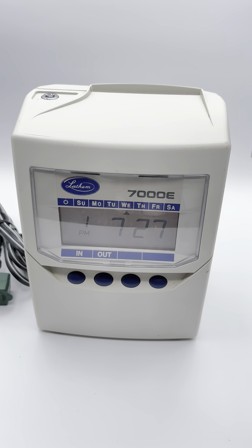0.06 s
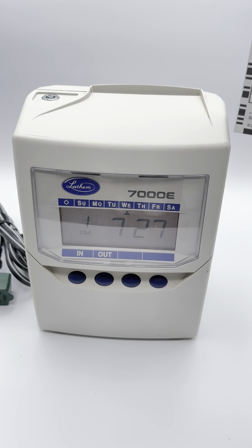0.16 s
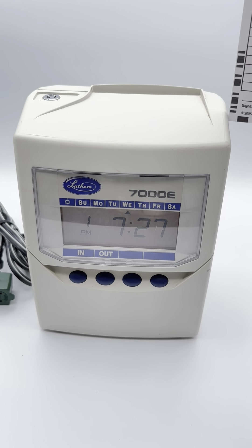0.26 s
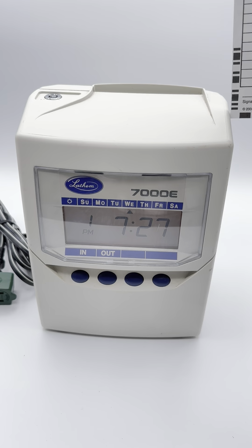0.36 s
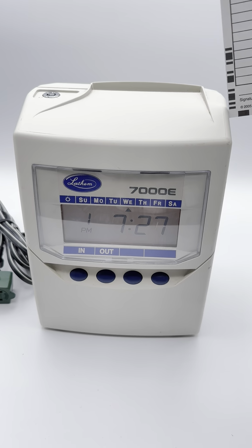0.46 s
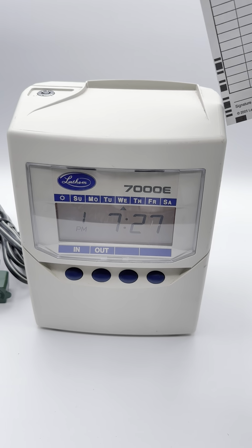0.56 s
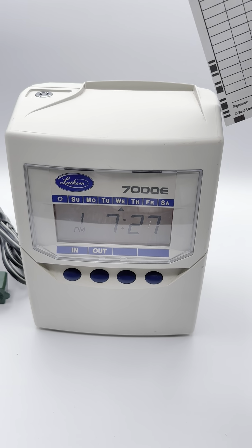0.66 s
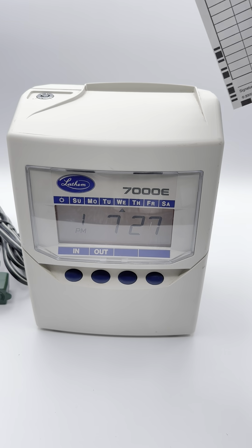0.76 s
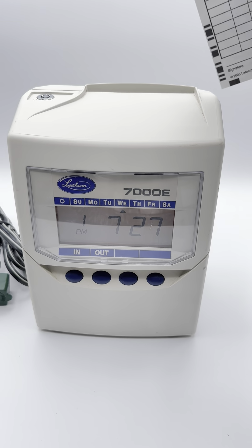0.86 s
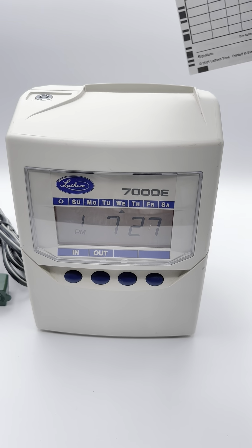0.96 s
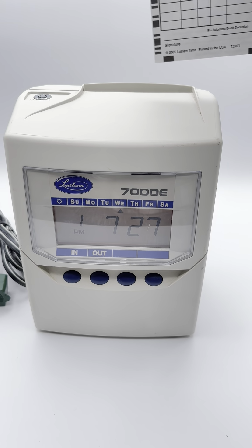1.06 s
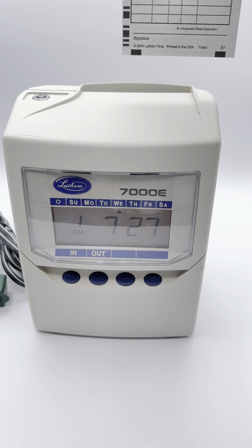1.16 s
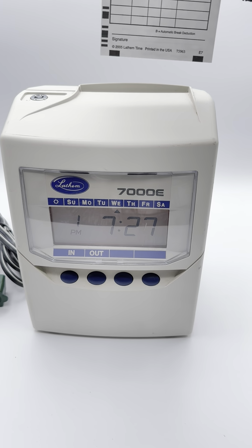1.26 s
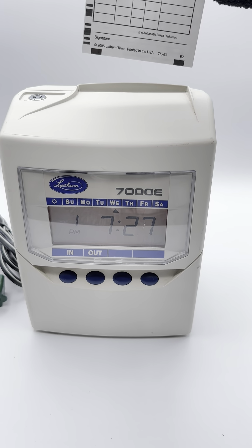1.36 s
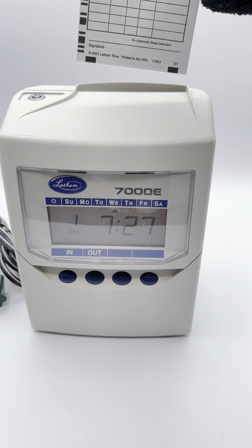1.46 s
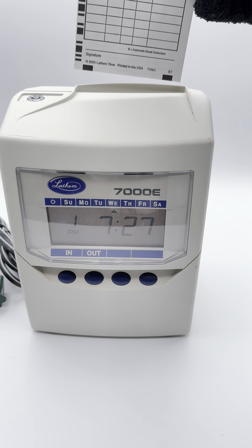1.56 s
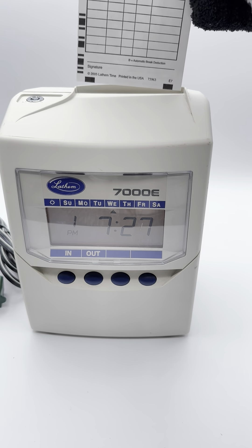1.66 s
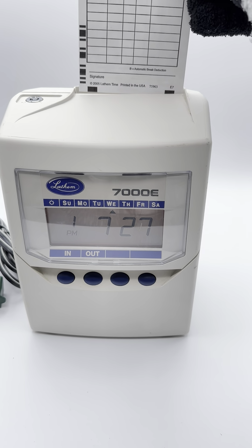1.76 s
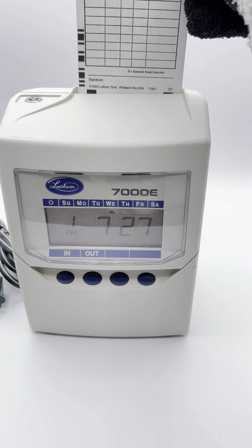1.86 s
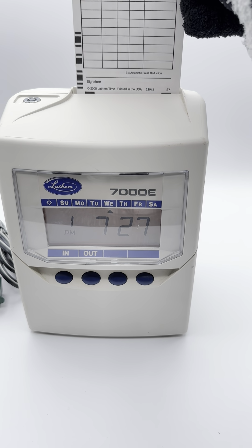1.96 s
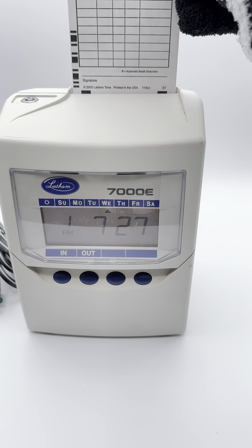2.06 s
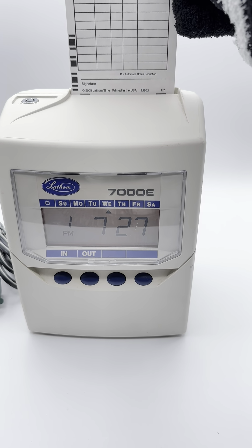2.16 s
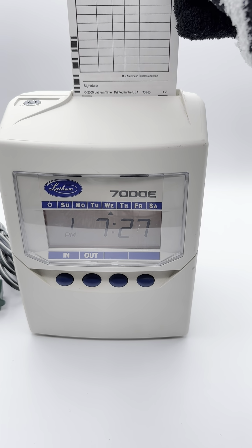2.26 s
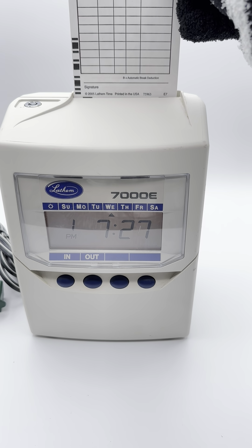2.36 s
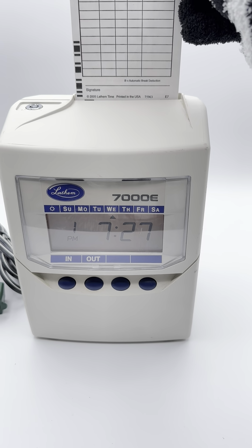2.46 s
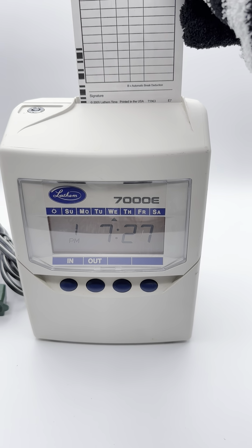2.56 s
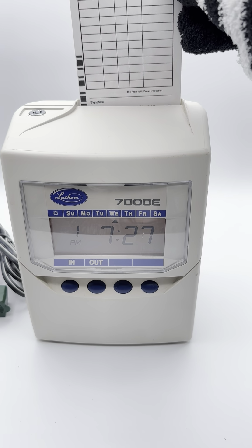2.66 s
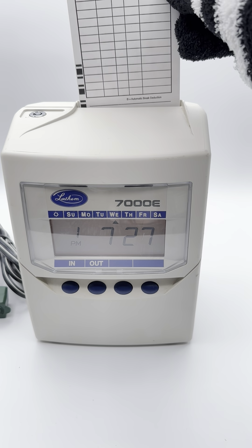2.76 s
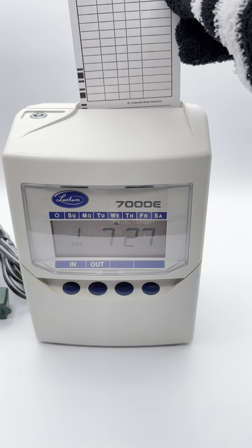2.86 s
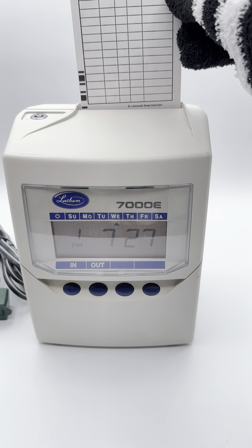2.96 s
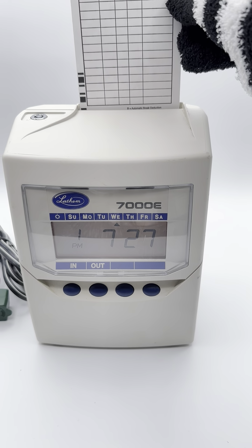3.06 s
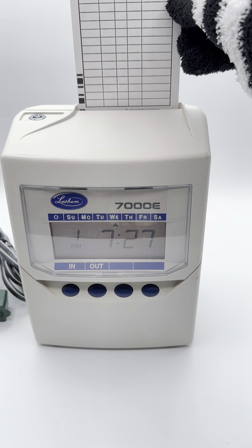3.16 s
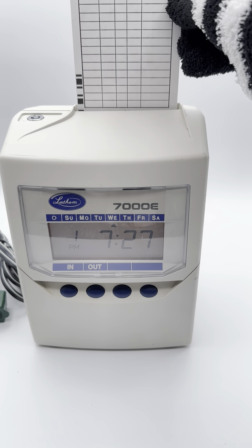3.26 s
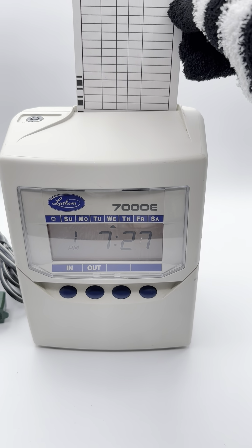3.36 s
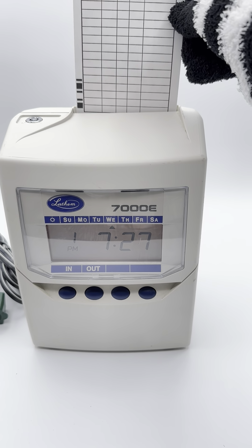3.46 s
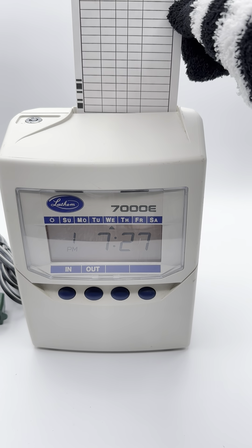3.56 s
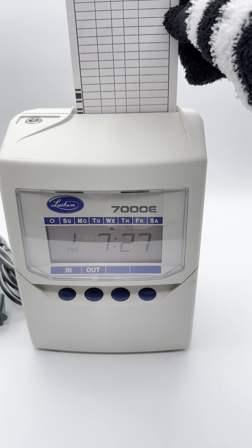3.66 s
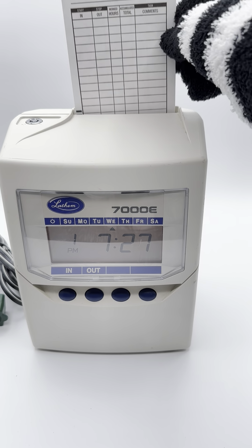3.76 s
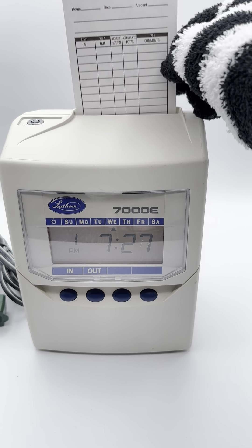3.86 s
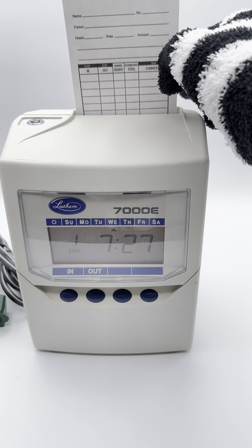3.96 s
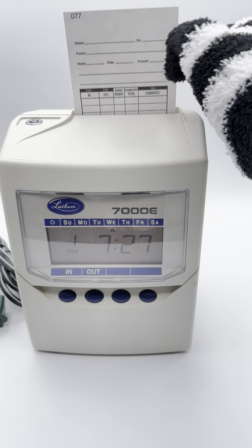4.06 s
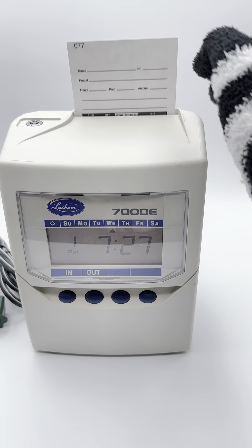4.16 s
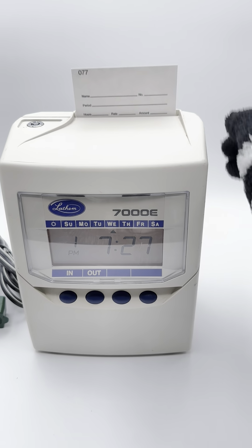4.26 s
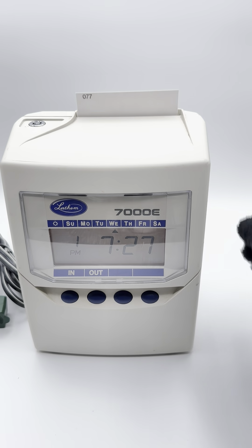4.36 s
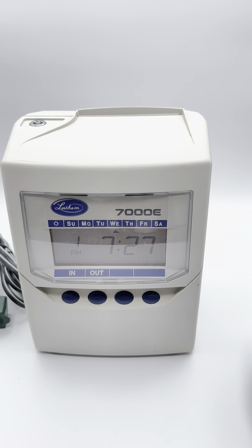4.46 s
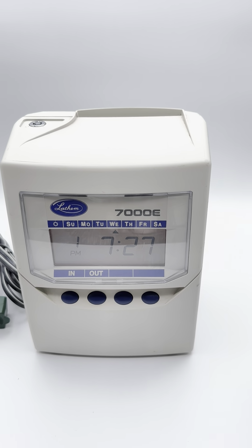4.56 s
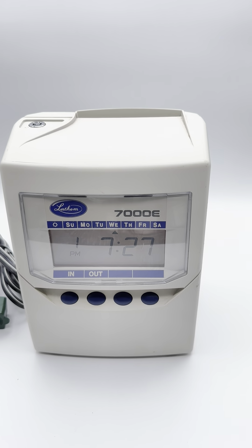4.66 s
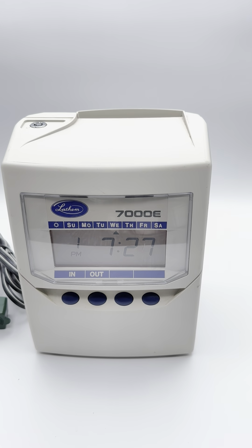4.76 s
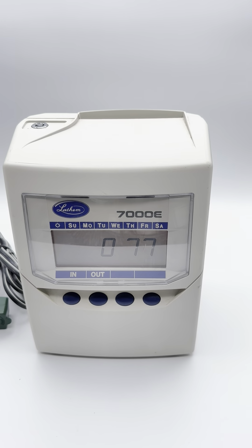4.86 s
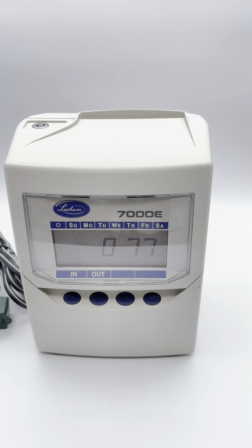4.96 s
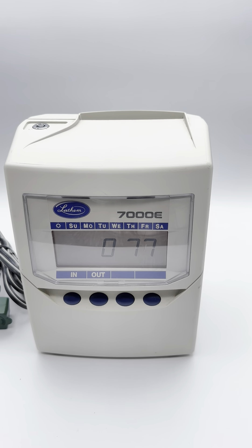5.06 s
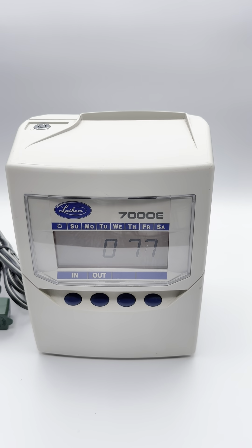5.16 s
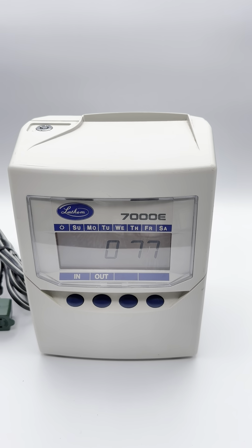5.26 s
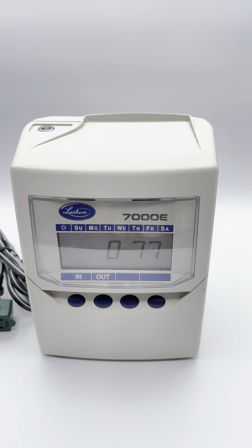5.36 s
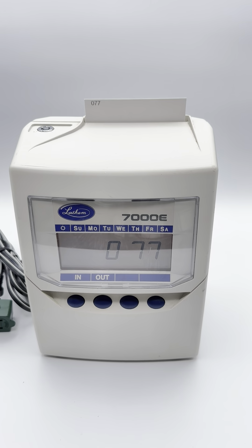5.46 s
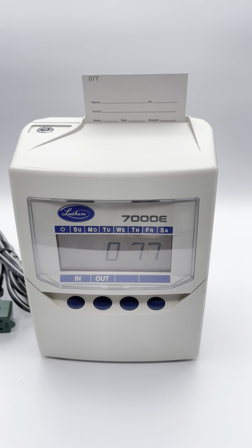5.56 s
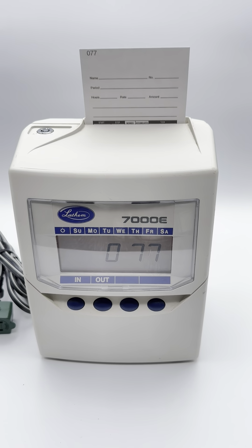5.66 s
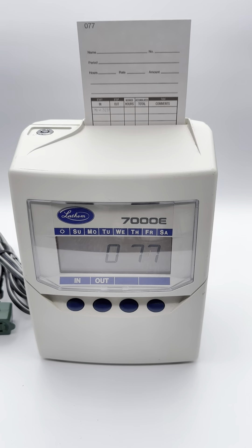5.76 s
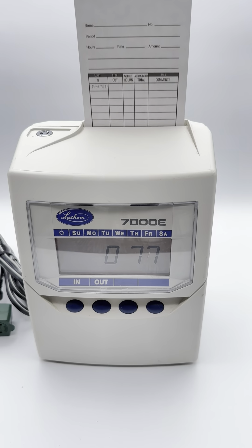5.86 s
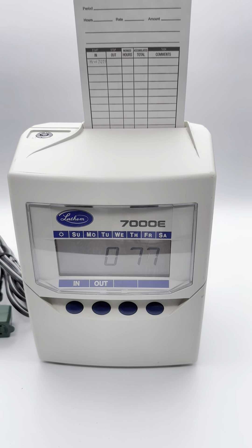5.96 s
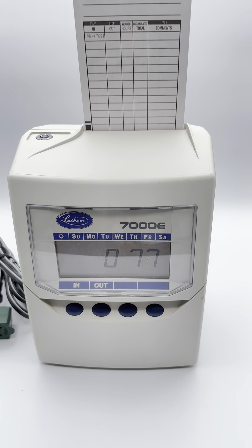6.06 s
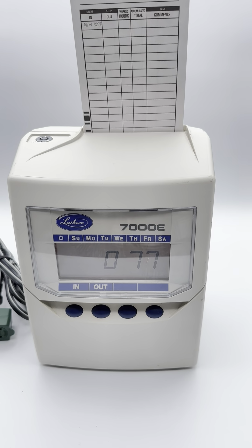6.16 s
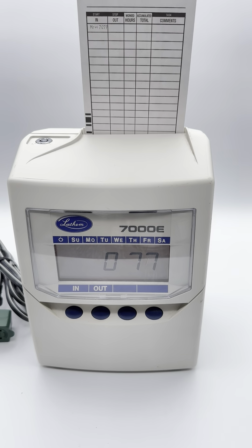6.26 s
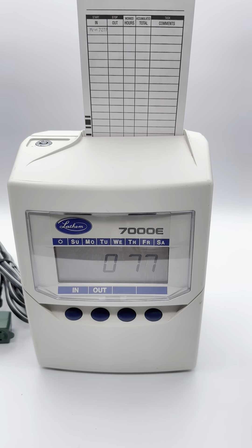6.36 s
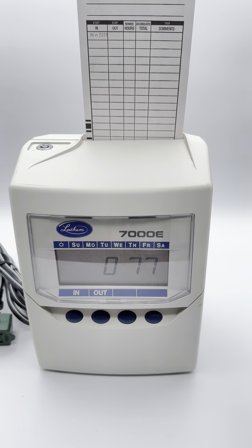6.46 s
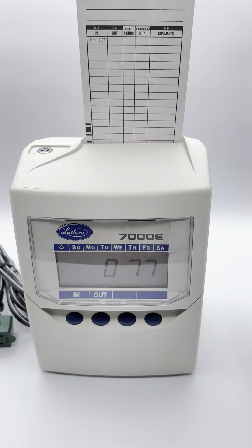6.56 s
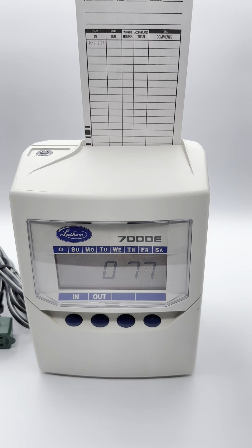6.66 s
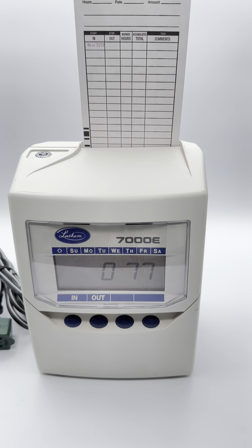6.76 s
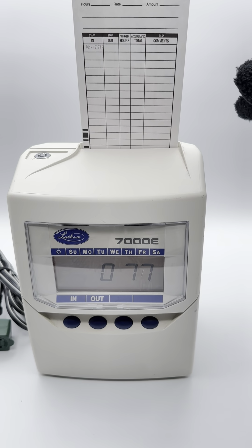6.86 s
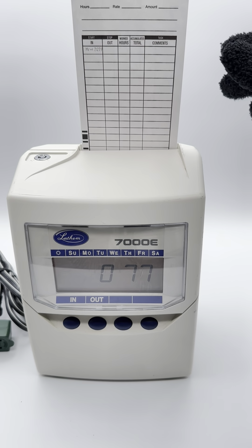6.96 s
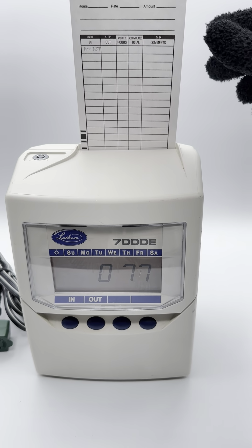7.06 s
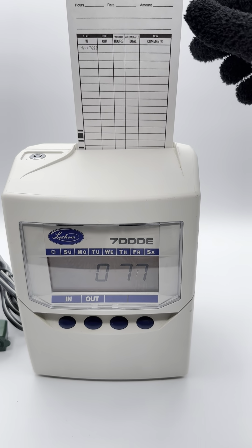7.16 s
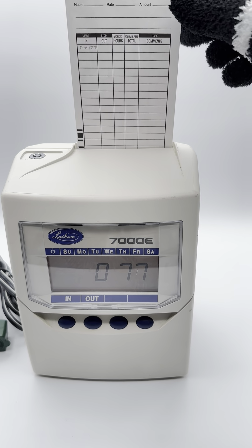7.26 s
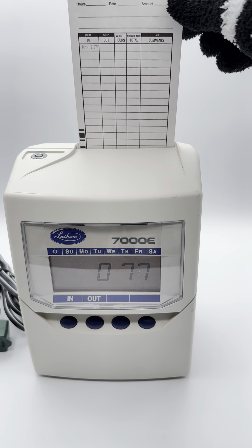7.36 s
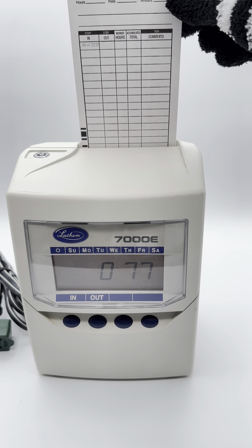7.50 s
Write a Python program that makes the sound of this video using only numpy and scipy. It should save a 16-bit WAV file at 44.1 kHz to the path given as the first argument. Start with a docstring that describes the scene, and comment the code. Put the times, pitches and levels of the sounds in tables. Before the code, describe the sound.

A close stereo microphone in a small, quiet room with faint mains hum, dull room tone and soft hiss. From 0.2 to 0.7 seconds a stiff card taps plastic a few times, with short papery rubs; more light taps come around 1.8, 2.0 and a clearer one at 2.5. A faint low drone rises slowly underneath from 1.5 to 5.3. At 3.2 a sharp click starts a small geared motor, whirring and rattling; at 3.7 it grips the card with dull knocks and a strained tone, coasting down after 4.5. Small clicks fall between 4.8 and 5.0. At 5.05 a carriage whines and rattles, with a tiny, bright needle buzz at 5.15, then knocks and squeaks until 5.5. From 5.33 the motor whirs again, slightly higher, pushing the card out; a loud clack rings at 6.14, then it runs freely and stops abruptly at 7.4, leaving quiet hum.

```python
"""A small quiet room, a stereo microphone close to an electric time clock: a paper card taps and rubs first.
A geared motor then starts and draws the card in, as summed gear tones over the rattle of random tooth impacts.
After it stops, a carriage whines and rattles, and needles strike one short burst of print on a rapid beat.
The motor pushes the card back out, with a loud clack of filtered noise and ringing case modes on the way.
Mains hum and dull room tone lie underneath; a faint rising drone joins them for part of the time."""
import sys
import numpy as np
from scipy import signal
from scipy.fft import rfft, irfft, next_fast_len
from scipy.io import wavfile

SR = 44100
rng = np.random.default_rng(int(sys.argv[2]) if len(sys.argv) > 2 else 0)


def materialize(psi):
    """Save the field psi as 16-bit PCM at rate SR to the path in sys.argv[1].

    A 1-D psi becomes a single channel; in a 2-D psi each row is a channel.
    """
    bounded = np.clip(np.atleast_2d(psi).T, -1, 1)
    quanta = np.round(bounded * 32767).astype(np.int16)
    wavfile.write(sys.argv[1], SR, quanta)


N = 332073
TIME = np.arange(N) / SR

# gear tones, card going in and coming out, before the overall tone level: (multiple of shaft speed [ratio],
# level running free [dB], level with card gripped [dB], swell per unit of roller tightness [dB])
GEAR_TONES_IN = [(3.02, -15, -11, 0), (5, -14, -4, 0), (8.33, -15, -21, 0), (10, -.5, -2, 3.5),
                 (13.16, -9, -22, 0), (14.15, -6, 0, 0), (15, -6, -20, 0), (17.9, -16, -24, 0),
                 (20.05, -17, -19, 0), (22.65, -26, -13, 2), (28.36, -10, -16, 0), (41.1, -17, -16, 0),
                 (42.52, -8, -4.5, 0)]
GEAR_TONES_OUT = [(3.03, -9, -12, 0), (3.98, -12, -20, 0), (4.98, -8, -4.5, 0), (9.12, -1, -5.5, 1),
                  (10, -3, -3.5, 2), (13.5, -12, -16, 0), (14.32, -8, -16, 0), (15.26, -19, -8.5, 0),
                  (17.67, -10, -18, 0), (20.42, -15, -15, 0), (22.35, -21, -10, 0), (28.31, -4.5, -19, 0),
                  (29.72, -13, -19, 0), (38.85, -12, -20, 0), (41.2, -19, -10, 0), (42.58, -5, -3.5, 0),
                  (49.25, -20, -18, 0), (57.67, -18, -24, 0)]
# colour of the gear rattle in each direction: (frequency [Hz], relative level [dB])
RATTLE_COLOUR_IN = [(150, -31), (580, -14), (760, -4.5), (900, 4), (1080, -11), (1300, -2), (1550, -9.5),
                    (1800, -9), (2030, -3.5), (2200, -10), (2450, -4), (2820, -10), (3750, -3),
                    (4500, -14.5), (5200, -15), (7000, -47)]
RATTLE_COLOUR_OUT = [(150, -26.5), (600, -11.5), (760, -6.5), (880, 1), (1030, -4), (1300, -2),
                     (1750, -8.5), (1950, -5.5), (2200, -10.5), (2720, -4), (2950, -8.5), (3400, -9.5),
                     (3650, -3), (4400, -17.5), (4950, -10), (5370, -13), (5700, -20.5), (6500, -16.5),
                     (12000, -63)]
# speed of the motor shaft in each direction: (time [s], turns per second [Hz])
SHAFT_SPEED_IN = [(3.18, 78), (3.26, 83), (3.32, 90.4), (3.72, 90), (3.82, 87.2), (4.3, 87.2), (4.36, 88),
                  (4.5, 87.9), (4.65, 82)]
SHAFT_SPEED_OUT = [(5.33, 82), (5.45, 88.2), (5.6, 89.5), (6, 91), (6.13, 90.9), (6.2, 91.8), (7.36, 92.3),
                   (7.45, 88)]
# colour of the sliding card, also of bright impact edges: (frequency [Hz], relative level [dB])
SLIDE_COLOUR = [(2500, -34), (4400, 4.5), (5000, 3), (6400, 2.5), (8000, 1), (10000, 4), (11500, -9.5),
                (15500, -11)]
# colour of the rumbling case, also of impact thuds: (frequency [Hz], relative level [dB])
RUMBLE_COLOUR = [(90, -31), (160, -1.5), (205, -2.5), (270, 2), (350, 2), (440, -3), (520, -6), (640, -24),
                 (1200, -46)]
# the rollers hold the card between these times; its edge starts to scrape in the guide a little sooner
GRIP_S, RELEASE_S, SCRAPE_S, GRIP_RAMP_S = 3.72, 6.13, 3.607, 0.017
SCRAPE_RAMP_S, SCRAPE_DB = 0.14, 8.5  # how fast and how much the sliding hiss grows
# the feed roller turns at this share of the shaft speed; one tight spot passes at this time
ROLLER_SHARE, ROLLER_TIGHT_S = .07, 3.98
GEAR_RISE_S, HUM_RISE_S, RUMBLE_FADE_S = 0.057, 0.18, 0.59


def feed(tones, gears, on_s, off_s, coast_s, speeds, strain_db, tones_db, rattle_db, slide_db, rumble_db,
         hum_db, hum_held_db, throb, flutter, backlash):
    """A small motor and gear train hum, mesh and rattle; the gripped card shifts the tones and strains the gears."""
    grip = ramp(GRIP_S, GRIP_RAMP_S) - ramp(RELEASE_S, GRIP_RAMP_S)
    scrape = ramp(SCRAPE_S, SCRAPE_RAMP_S) - ramp(RELEASE_S, GRIP_RAMP_S)
    speed = np.interp(TIME, *np.transpose(speeds))
    turns = np.cumsum(speed * (1 + flutter * wander(21.9))) / SR
    shaft = 2 * np.pi * turns

    # the teeth press harder once and twice a shaft turn and once a turn of the slower idler wheel
    load = 1 + throb * np.cos(shaft) + 0.047 * np.cos(2 * shaft)
    load = load + 0.12 * np.cos(shaft * .208) + 0.14 * wander(20)

    # play between the teeth jitters the wheels, which smears the high tones most
    angle = shaft + backlash * wander(80) + .006 * wander(250)
    roller = 2 * np.pi * ROLLER_SHARE * (turns - np.interp(ROLLER_TIGHT_S, TIME, turns))
    tight = np.cos(roller) + .5 * np.cos(2 * roller)
    mesh = np.zeros(N)
    for multiple, free_db, held_db, swell_db in tones:
        level = amp(free_db + grip * (held_db - free_db) + swell_db * tight)
        mesh += level * (1 + 0.36 * wander(44)) * np.sin(multiple * angle)

    running = gate(on_s, off_s, GEAR_RISE_S, coast_s)
    song = amp(tones_db) * np.sqrt(2) * mesh * running ** 3  # coasting gears rattle but hardly sing
    rattle = amp(rattle_db) * chatter(6000, 1.34, gears, apart=0.58)
    paper = amp(slide_db + SCRAPE_DB * scrape) * chatter(12000, 0.41, SLIDE_COLOUR, apart=0.039)
    gears_and_card = running * load * (song + amp(strain_db * grip) * rattle + paper)

    rumble_swell = gate(on_s, off_s, GEAR_RISE_S, RUMBLE_FADE_S)
    rumble = amp(rumble_db) * rumble_swell * colour(noise() * load, RUMBLE_COLOUR)
    hum_swell = gate(on_s, off_s, HUM_RISE_S, coast_s)
    hum = amp(hum_db + hum_held_db * grip) * hum_swell * np.sqrt(2) * np.sin(shaft)
    return gears_and_card + rumble + hum


# print carriage, out and back: (time [s], pitch of its drive [Hz], level of the whine [dB])
CARRIAGE_WHINE = [(5.05, 900, -46), (5.075, 930, -43), (5.087, 960, -37), (5.098, 1100, -47),
                  (5.112, 1190, -37), (5.128, 1290, -40), (5.143, 1225, -31), (5.16, 1192, -33),
                  (5.27, 1194, -32.5), (5.295, 1175, -37), (5.308, 1215, -43), (5.335, 1285, -39),
                  (5.356, 1195, -32), (5.372, 1130, -42), (5.39, 1200, -36), (5.408, 1235, -38),
                  (5.425, 1200, -48), (5.47, 1080, -47), (5.5, 950, -45), (5.512, 900, -31),
                  (5.53, 880, -40)]
# colour of the carriage rattle: (frequency [Hz], relative level [dB])
CARRIAGE_COLOUR = [(300, -11), (600, -6.5), (950, 3), (1250, 0.5), (1600, -9.5), (2200, -10), (3000, -21),
                   (3750, -11), (4500, -18), (6500, -21), (10000, -24.5), (11800, -43), (15500, -47)]
CARRIAGE_START_S, CARRIAGE_STOP_S, CARRIAGE_RISE_S, CARRIAGE_FALL_S = 5.04, 5.515, 0.06, 0.03
CARRIAGE_SHAKE_S, CARRIAGE_RATTLE_DB, CARRIAGE_RUMBLE_DB = 0.05, -40.3, -45


def carriage():
    """The drive whines up to speed, holds steady under the print and wavers home, shaking the carriage."""
    times, hz, db = np.transpose(CARRIAGE_WHINE)
    turns = np.cumsum(np.interp(TIME, times, hz) * (1 + 0.014 * wander(130))) / SR
    teeth = 1 + 0.25 * np.cos(2 * np.pi * turns / 8) + 0.24 * wander(160)
    whine = amp(np.interp(TIME, times, db)) * np.sqrt(2) * np.sin(2 * np.pi * turns)
    rattle = amp(CARRIAGE_RATTLE_DB) * chatter(1200, 1.3, CARRIAGE_COLOUR, apart=0.53)
    rumble = amp(CARRIAGE_RUMBLE_DB) * chatter(900, 0.82, RUMBLE_COLOUR, apart=0.045)
    shaking = np.sqrt(ramp(CARRIAGE_START_S, CARRIAGE_SHAKE_S))
    moving = gate(CARRIAGE_START_S, CARRIAGE_STOP_S, CARRIAGE_RISE_S, CARRIAGE_FALL_S)
    return moving * teeth * (whine + shaking * (rattle + rumble))


# colour of needles and platen: (frequency [Hz], relative level [dB])
HEAD_COLOUR = [(60, -48), (200, -12), (400, -7), (520, 9), (750, -10.5), (1050, 1), (2100, -1),
               (2800, -11.5), (3250, 0), (3900, -15), (5000, -1), (5700, -4.5), (6900, 2.5), (7500, -2.5),
               (9400, 4), (11500, -3.5), (15500, -7.5)]
NEEDLE_HZ = 1067
PRINT_START_S, PRINT_STOP_S, PRINT_RISE_S, PRINT_FALL_S, PRINT_DB = 5.147, 5.19, 0.006, 0.016, -22.7


def needles():
    """Needles fire on a slightly unsteady beat with varying strength, and chatter as they rebound."""
    beat = np.diff(np.floor(TIME * NEEDLE_HZ + 0.07 * wander(200)), prepend=0)
    strength = 1 + 0.58 * np.cos(2 * np.pi * TIME * NEEDLE_HZ / 3) + 0.74 * noise()
    t = np.arange(SR // 100) / SR
    housing = noise(len(t)) * amp(-60 * t / 0.016)  # each strike scatters inside the housing
    strikes = unit(signal.oaconvolve(beat * strength, housing)[:N])
    rebound = 0.93 * grains(12000, 0.63)
    burst = gate(PRINT_START_S, PRINT_STOP_S, PRINT_RISE_S, PRINT_FALL_S)
    return amp(PRINT_DB) * burst * colour(strikes + rebound, HEAD_COLOUR)


# the card tapping the case: (time [s], level [dB], thud above a -23 dB base [dB], brightness [dB],
# card ring [dB], centre of the modes it wakes [Hz])
CARD_TAPS = [(0.22, -37.5, 2.5, -3, -3, 1110), (0.47, -61, -2, -12, 4, 1150),
             (0.485, -51.5, 3, -16, 7, 1100), (0.515, -46, -2, -16, 5, 1000),
             (0.721, -49, -7, -10, 3, 1600), (0.731, -40.5, -5, -11, 1.5, 1390),
             (1.793, -53, 11, -8, 3, 900), (1.803, -50, 10, -10, -4, 450), (1.826, -46.5, 8, -13, 3.5, 830),
             (1.844, -57, 6, -7, 0, 1400), (1.954, -51, 2, 1.5, 1, 1200), (2.021, -51, 7, -11, 4.5, 1110),
             (2.423, -55.5, 7, -2, -2, 1200), (2.51, -36.5, -1, -13.5, 5, 930),
             (2.659, -59, 15.5, -7, 3, 600), (3.021, -61.5, 5, -14, 4, 980),
             (4.815, -45, -10, -16, -3, 2000)]
# light, sharp ticks of switches and pawls: (time [s], level [dB])
SWITCH_TICKS = [(3.118, -51.5), (4.925, -32), (4.988, -36.5), (5.341, -30.5)]
# heavy clacks of the mechanism: (time [s], level [dB], thud above a -23 dB base [dB], case ring [dB],
# centre of the modes it wakes [Hz])
MECHANISM_CLACKS = [(3.177, -36, -10, -3, 1300), (3.187, -28.5, -1, 0, 2450), (3.19, -41.5, -18, 14, 884),
                    (4.833, -40, 7.5, 3.5, 870), (4.843, -49, -5, 9, 1000), (4.856, -53.5, 2, 11.5, 910),
                    (4.873, -55, -9, 11, 800), (5.309, -42, 6, 17, 710), (5.353, -34.5, 3, 2, 1200),
                    (5.451, -40, 3, 7, 900), (5.506, -42.5, 7, 8.5, 900), (6.133, -33.5, -12, 5, 1200),
                    (6.1363, -18, -4, -1.5, 950), (6.1419, -30, 5, 3, 350)]
# modes of the stiff card struck on its edge: (frequency [Hz], relative level [dB], t60 [s])
CARD_EDGE_MODES = [(447, 7, 0.05), (694, 2, .06), (757, 2.5, .06), (879, -3.5, 0.071), (975, -8.5, 0.058),
                   (1206, 3.5, 0.043), (1350, -2, 0.044), (1613, 0.5, 0.055), (1930, 3.5, 0.046),
                   (3085, 2.5, .035)]
# modes of the plastic case: (frequency [Hz], relative level [dB], t60 [s])
CASE_MODES = [(191, -1, 0.14), (286.6, -0.5, 0.19), (366.6, 3, 0.11), (693, -2, 0.053), (800, -7, 0.06),
              (884, 1, 0.051), (944, -4.5, 0.058), (1182, 0, 0.032), (1332, -2.5, 0.041), (1367, -6, 0.044),
              (1556, -10, 0.03), (1835, -15, .04), (2100, -6, 0.045), (2826, 3, 0.035), (3620, 2, 0.026)]


def clicks():
    """Taps wake the modes of the card; switch ticks and mechanism clacks wake those of the case."""
    out = np.zeros(N)
    for s, db, thud_db, bright_db, ring_db, centre_hz in CARD_TAPS:
        add(out, s, blow(db, thud_db, bright_db, ring_db, centre_hz, t60=0.04, modes=CARD_EDGE_MODES))
    for s, db in SWITCH_TICKS:
        add(out, s, blow(db, thud_db=-20.0, bright_db=0.5, ring_db=-11.5, centre_hz=2200, t60=0.031,
                         modes=CASE_MODES))
    for s, db, thud_db, ring_db, centre_hz in MECHANISM_CLACKS:
        add(out, s, blow(db, thud_db, bright_db=-11.5, ring_db=ring_db, centre_hz=centre_hz, t60=0.043,
                         modes=CASE_MODES))
    return out


# colour of the clatter in each blow: (frequency [Hz], relative level [dB])
CRACK_COLOUR = [(300, -34), (700, -5), (1300, 1.5), (2700, -4), (4000, -10), (5500, -8), (11000, -56.5)]


def blow(db, thud_db, bright_db, ring_db, centre_hz, t60, modes):
    """A short clatter with a bright edge, a low thud and the ring of what was struck."""
    t = np.arange(SR // 3) / SR
    burst = amp(-60 * t / t60) * (1 - np.exp(-t / 0.001))
    edge = amp(bright_db) * colour(noise(len(t)), SLIDE_COLOUR)
    crack = burst * (colour(noise(len(t)), CRACK_COLOUR) + edge)
    thud = colour(noise(len(t)) * amp(-60 * t / 0.12), RUMBLE_COLOUR)
    ring = np.zeros(len(t))
    for hz, mode_db, decay in modes:
        # where the blow lands decides which modes ring most
        off_centre_db = 11.8 * abs(np.log2(hz / centre_hz))
        level = amp(mode_db - off_centre_db - 60 * t / decay)
        ring += level * np.sin(2 * np.pi * (hz * t + rng.random()))
    ring *= 1 - np.exp(-t / 0.0017)
    return amp(db) * (0.84 * crack + amp(thud_db - 23) * thud + amp(ring_db) * ring)


# dull knocks of the case: (time [s], level [dB], pitch [Hz])
CASE_KNOCKS = [(.588, -43, 225), (2.024, -41, 190), (3.738, -22, 345), (3.755, -25, 268), (3.79, -29, 235),
               (3.823, -29, 270), (4.057, -35, 272), (4.102, -30, 258), (5.122, -20.5, 272),
               (5.296, -22.5, 205), (5.316, -24, 275), (5.351, -23.5, 330), (5.369, -19.5, 268),
               (5.392, -25, 300), (5.415, -21, 210), (5.45, -26, 230), (5.487, -22.5, 285),
               (5.522, -21.5, 232), (6.139, -26, 185), (6.141, -17.5, 405)]
KNOCK_RISE_S, KNOCK_DECAY_S, KNOCK_UPPER_RATIO, KNOCK_UPPER_DB = 0.0043, 0.063, 1.42, -10.5


def knocks():
    """Dull knocks: a panel of the case swings a few times in two modes and stops."""
    out, t = np.zeros(N), np.arange(SR // 5) / SR
    for s, db, hz in CASE_KNOCKS:
        upper = amp(KNOCK_UPPER_DB) * np.sin(2 * np.pi * KNOCK_UPPER_RATIO * hz * t)
        swing = np.sin(2 * np.pi * hz * t) + upper
        add(out, s, amp(db - 60 * t / KNOCK_DECAY_S) * (1 - np.exp(-t / KNOCK_RISE_S)) * swing)
    return out


# sudden loads that set the case rumbling: (time [s], level [dB])
LOAD_JOLTS = [(3.736, -40), (4.05, -49), (4.11, -53), (5.115, -32.5), (5.364, -33.5), (5.495, -39.5),
              (6.145, -42)]
JOLT_RISE_S, JOLT_DECAY_S = 0.023, 0.42  # the decay is a t60


def jolts():
    """Each sudden load shakes the case, which rumbles and settles."""
    shake = np.zeros(N)
    for s, db in LOAD_JOLTS:
        shake += ramp(s, JOLT_RISE_S) * amp(db - 60 * np.maximum(TIME - s, 0) / JOLT_DECAY_S)
    return shake * chatter(2500, 0.38, RUMBLE_COLOUR, apart=0.081)


# raspy squeaks of the carriage and the outgoing card: (start [s], length [s], from [Hz], to [Hz],
# level before a 3 dB cut [dB])
SLIP_SQUEAKS = [(5.068, .04, 3800, 3900, -43), (5.205, .085, 5800, 5200, -53),
                (5.265, .06, 2550, 2050, -44), (5.385, .05, 2030, 1970, -44), (5.405, .05, 1660, 1620, -44),
                (5.42, .08, 3700, 3800, -39), (5.68, .1, 3350, 3200, -50), (5.91, .12, 1950, 2650, -51)]
SQUEAK_WIDTH_HZ = 130  # rate of the random slips, which widens the tone


def squeaks():
    """The carriage on its rail and the card in its guide slip unevenly, sounding a narrow, gliding resonance."""
    out = np.zeros(N)
    for s, length, from_hz, to_hz, db in SLIP_SQUEAKS:
        along = np.arange(0, length, 1 / SR) / length
        glide_hz = from_hz + (to_hz - from_hz) * along
        turn = np.exp(2j * np.pi * np.cumsum(glide_hz) / SR)
        slips = (wander(SQUEAK_WIDTH_HZ) + 1j * wander(SQUEAK_WIDTH_HZ))[:len(along)]
        add(out, s, amp(db) * np.sin(np.pi * along) * unit((slips * turn).real) / np.sqrt(2))
    return out


# the card rubbing on glove and slot: (start [s], length [s], share spent swelling [ratio], level [dB],
# paper hiss before a 4 dB cut [dB], favoured pitch [Hz])
CARD_RUBS = [(0.138, 0.36, 0.22, -72, -65, 1500), (0.458, 0.16, 0.39, -45, -59, 1110),
             (0.712, .04, 0.81, -43, -59, 1460), (1.728, 0.57, 0.075, -67.5, -81, 3800),
             (1.785, 0.063, 0.29, -51.5, -59, 450), (2.006, 0.049, .24, -57, -71, 1300),
             (2.143, 0.084, 0.28, -62, -67.5, 1500), (2.474, 0.066, .45, -61, -65, 1000),
             (2.62, 0.34, 0.14, -69.5, -89, 6300), (2.949, .42, .24, -68, -94, 1500),
             (3.168, 0.044, 0.26, -42.5, -52, 890), (3.613, .14, 0.55, -46.5, -62, 6300),
             (4.689, 0.12, 0.22, -67.5, -66, 2040), (4.81, 0.08, 0.22, -51, -64, 1710),
             (5.911, 0.2, 0.68, -51, -66, 2300)]
# colour of the stiff card: (frequency [Hz], relative level [dB])
CARD_COLOUR = [(60, -34), (300, 4.5), (550, -8), (800, 3), (1100, 2.5), (1500, -3), (1900, -7),
               (2800, -12.5), (4400, -14), (5700, -18.5), (6250, -5), (6800, -22), (10000, -39),
               (15500, -37)]
RUB_FOCUS_DB = 4.5  # how strongly a stroke favours its own pitch


def rubs():
    """Paper fibres catch and slip, sounding the stiff card around one pitch; each stroke swells and fades."""
    body, hiss = np.zeros((2, N))
    hz = np.geomspace(50, SR / 2, 200)
    for start, length, peak, db, hiss_db, centre_hz in CARD_RUBS:
        along = np.arange(0, length, 1 / SR) / length
        stroke = np.sin(np.interp(along, [0, peak, 1], [0, np.pi / 2, 0])) ** 1.6
        focus = RUB_FOCUS_DB * np.exp(-(np.log2(hz / centre_hz) / 0.56) ** 2)
        spectrum = np.transpose([hz, read(CARD_COLOUR, hz) + focus])
        fibres = colour(grains(2500, 1.6)[:len(stroke)], spectrum)
        add(body, start, amp(db) * stroke * fibres)
        add(hiss, start, amp(hiss_db) * stroke)
    catching = amp(1.3 * wander(59))
    return catching * body + amp(-4) * hiss * colour(grains(8000, 1.1), SLIDE_COLOUR)


# mains hum: (frequency [Hz], level [dB])
MAINS_HUM = [(60, -58), (120, -63.5)]
# colour of the room tone: (frequency [Hz], relative level [dB])
ROOM_COLOUR = [(25, -26), (45, 1), (90, 0.5), (160, -11.5), (300, -3), (450, -9.5), (700, -21),
               (1200, -30.5), (2500, -40.5), (5000, -41.5), (10000, -40.5), (15000, -55.5)]
# a faint low drone that slowly rises, perhaps an engine far outside
DRONE_START_S, DRONE_STOP_S, DRONE_RISE_S, DRONE_FALL_S = 1.5, 5.3, 1, 0.44
DRONE_HZ, DRONE_HZ_PER_S, DRONE_DB, DRONE_DB_PER_S = 79.5, 7.8, -64, 2.5  # pitch and level from the start


def background():
    """Steady sines of mains hum, dull room tone of filtered noise and a faint gliding drone from outside."""
    hum = np.zeros(N)
    for hz, db in MAINS_HUM:
        hum += amp(db) * np.sqrt(2) * np.sin(2 * np.pi * (hz * TIME + rng.random()))
    age = TIME - DRONE_START_S
    present = gate(DRONE_START_S, DRONE_STOP_S, DRONE_RISE_S, DRONE_FALL_S)
    swell = amp(DRONE_DB + DRONE_DB_PER_S * age) * present
    drone_turns = np.cumsum(DRONE_HZ + DRONE_HZ_PER_S * age) / SR
    drone = swell * np.sqrt(2) * np.sin(2 * np.pi * drone_turns)
    return hum + drone + amp(-60) * colour(noise(), ROOM_COLOUR)


# reverberation of the small room: (frequency [Hz], t60 [s])
ROOM_T60 = [(150, 0.34), (400, 0.5), (900, 0.3), (2500, 0.24), (10000, 0.093)]


def room(x):
    """A short diffuse tail of decaying noise, different at each microphone port."""
    hz, t, z = signal.stft(rng.standard_normal((2, SR // 2)), SR, nperseg=256)
    decay = amp(-60 * t / read(ROOM_T60, hz)[:, None])
    onset = 1 - np.exp(-t / 0.002)
    low_cut = (hz ** 2 / (hz ** 2 + 400 ** 2))[:, None]
    tail = signal.istft(z * decay * onset * low_cut, SR)[1]
    return signal.fftconvolve(x[None], tail / np.linalg.norm(tail[0]), axes=1)[:, :N]


def amp(db):
    """Decibels to gain."""
    return np.exp(np.asarray(db) * (np.log(10) / 20))


def unit(x):
    """Scales to an rms of one."""
    return x / np.sqrt(np.mean(x ** 2) + 1e-20)


def read(points, hz):
    """Reads a table on a log-frequency axis."""
    f, value = np.transpose(points)
    return np.interp(np.log(hz + 1), np.log(np.abs(f) + 1), value)


def add(mix, s, sound):
    """Mixes a sound in at time s."""
    part = mix[round(s * SR):][:len(sound)]
    part += sound[:len(part)]


def colour(x, spectrum, size=4096):
    """Rings x through a causal (minimum-phase) filter with this spectrum; rms one."""
    log_gain = np.log(amp(read(spectrum, np.abs(np.fft.fftfreq(size, 1 / SR)))))
    taps = np.fft.ifft(np.exp(np.conj(signal.hilbert(log_gain)))).real[:size // 2]
    return unit(signal.oaconvolve(x, taps)[:len(x)])


def noise(size=N):
    """White noise."""
    return rng.standard_normal(size)


def wander(hz, size=32):
    """Slow chance that fades out above a rate, drawn once every size samples; rms one."""
    count = next_fast_len(N // size + 2)
    low_pass = 1 / (1 + (np.fft.rfftfreq(count, size / SR) / hz) ** 2) ** 2
    slow = irfft(rfft(noise(count)) * low_pass, count)
    return unit(np.interp(TIME, np.arange(count) * size / SR, slow))


def grains(per_s, spread_db):
    """Tiny random impacts of uneven size; rms one."""
    at = np.flatnonzero(rng.random(N) < per_s / SR)
    sign, weight = noise(), rng.exponential(1, N)
    out = np.zeros(N)
    out[at] = sign[at] * amp(spread_db * np.minimum(weight[at], 4))
    return unit(out)


def chatter(per_s, spread_db, spectrum, apart):
    """Grains from all over the case: most reach both ports alike, a share reaches each on its own."""
    shared = grains(per_s, spread_db)
    return np.array([colour(shared + apart * grains(per_s, spread_db), spectrum) for port in range(2)])


def ramp(start, length):
    """Goes from zero to one over length seconds."""
    return np.clip((TIME - start) / length, 0, 1)


def gate(start, stop, rise, fall):
    """Attack from start, hold until stop, then release."""
    return ramp(start, rise) * (1 - ramp(stop, fall)) ** 1.6


def scene():
    """Card, motor, print and clicks close by, with their tail in the small room."""
    card_in = feed(GEAR_TONES_IN, RATTLE_COLOUR_IN, on_s=3.18, off_s=4.493, coast_s=0.16,
                   speeds=SHAFT_SPEED_IN, strain_db=4.5, tones_db=-48.2, rattle_db=-48, slide_db=-58.5,
                   rumble_db=-57, hum_db=-45.5, hum_held_db=-3.5, throb=0.11, flutter=0.002, backlash=0.004)
    card_out = feed(GEAR_TONES_OUT, RATTLE_COLOUR_OUT, on_s=5.33, off_s=7.385, coast_s=0.056,
                    speeds=SHAFT_SPEED_OUT, strain_db=1, tones_db=-49.5, rattle_db=-44.5, slide_db=-59.0,
                    rumble_db=-56.0, hum_db=-42.5, hum_held_db=-3.5, throb=0.03, flutter=0.0014,
                    backlash=0.003)
    machine = card_in + card_out + carriage() + jolts() + knocks() + squeaks()
    sharp = needles() + rubs() + clicks()
    tail = room(amp(-9.5) * machine.mean(0) + amp(-12.0) * sharp)
    return machine + sharp + background() + tail


# level balance of the two microphone ports: (frequency [Hz], left minus right [dB])
PORT_LEVELS = [(100, 0), (480, 0), (720, -7), (950, -10), (1220, -11), (1500, -3), (2200, 1.5), (3300, 0),
               (6000, 0)]
# phase between the ports: (frequency [Hz], lead of the left [rad])
PORT_LEAD = [(200, 0), (600, -.9), (950, -.3), (1250, 1.1), (1800, .1), (3400, .4), (4100, -.7),
             (5000, -3.2), (5500, -6.1), (6600, -6.4), (10000, -8.3), (12500, -9.4), (15500, -9.9)]
# colour of the microphone hiss: (frequency [Hz], relative level [dB])
HISS_COLOUR = [(500, 21.5), (3000, 4), (5000, -2.5), (10000, -23), (15000, -17.5)]
EDGE_HZ = 15900  # upper band limit


def record(dry):
    """The port pair tilts level and phase between the ears, each capsule adds its hiss; then the band limit."""
    size = next_fast_len(N + SR)
    hz = np.fft.rfftfreq(size, 1 / SR)
    tilt, lead = amp(read(PORT_LEVELS, hz)), read(PORT_LEAD, hz)
    bass_cut = 1 / np.sqrt(1 + (36 / (hz + 1)) ** 8)
    equal_power = np.sqrt(2 / (1 + tilt ** 2))
    ports = np.array([tilt, np.exp(-1j * lead)]) * equal_power * bass_cut
    hiss = amp(-69.5) * np.array([colour(noise(), HISS_COLOUR), colour(noise(), HISS_COLOUR)])
    heard = irfft(rfft(dry, size) * ports, size)[:, :N] + hiss
    band_limit = signal.firwin(511, EDGE_HZ, window=("kaiser", 9), fs=SR)
    return signal.oaconvolve(heard, band_limit[None], "same")


dry = scene()
out = record(dry)
materialize(out)
```